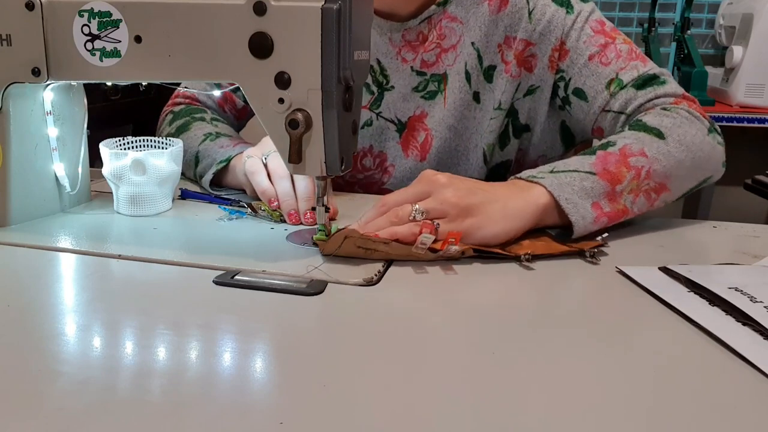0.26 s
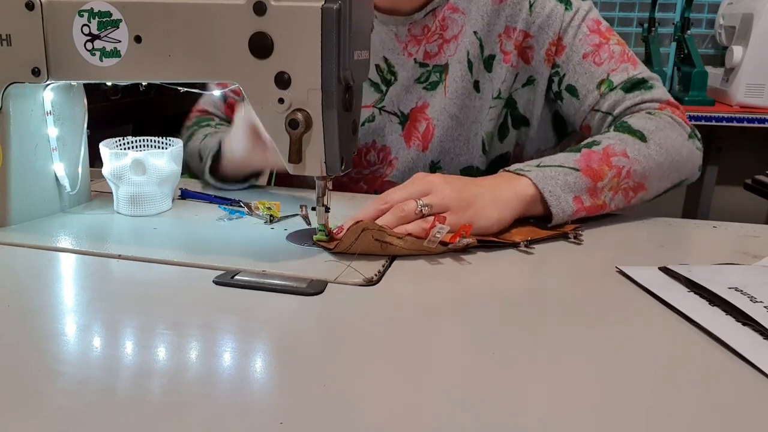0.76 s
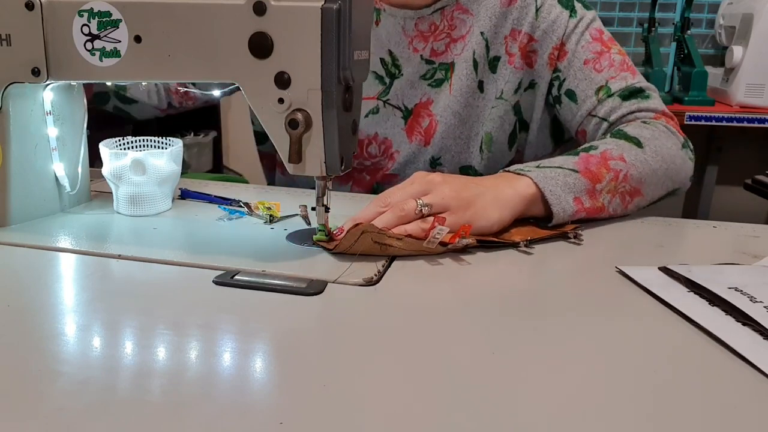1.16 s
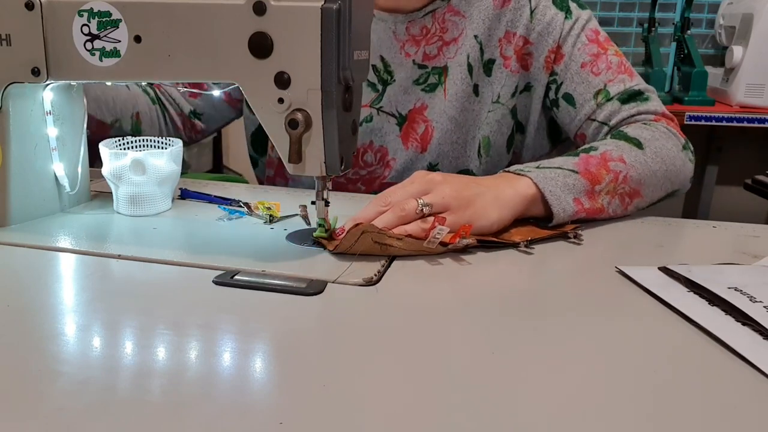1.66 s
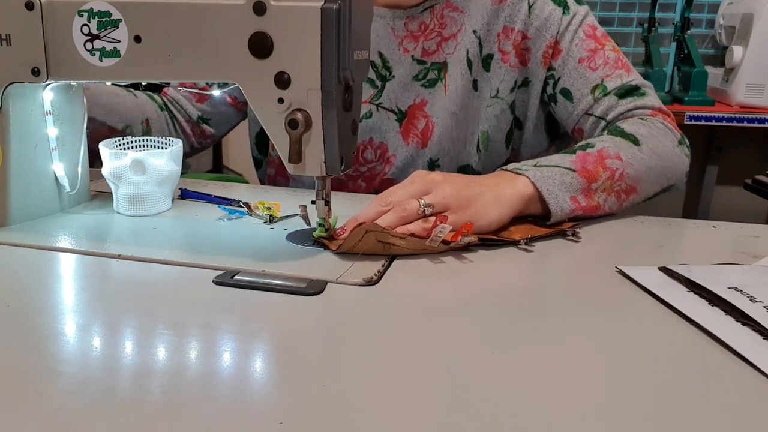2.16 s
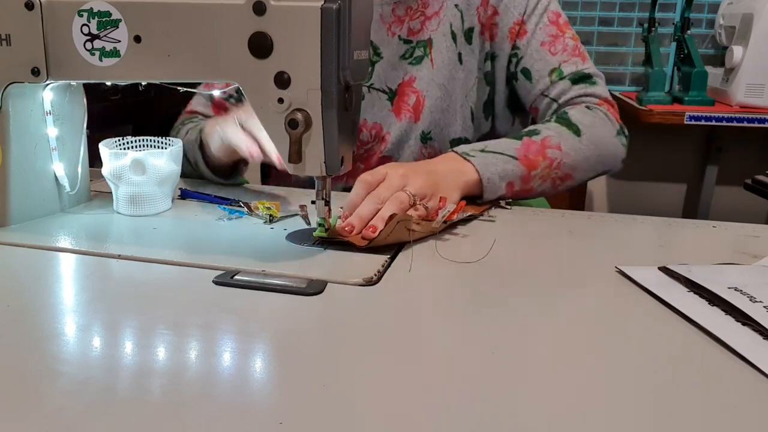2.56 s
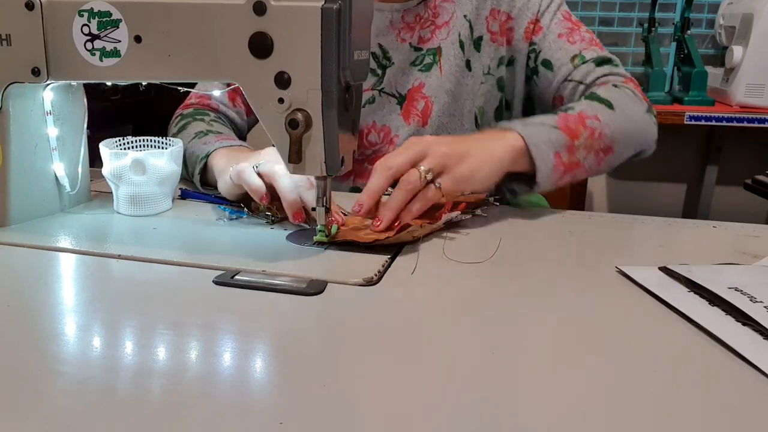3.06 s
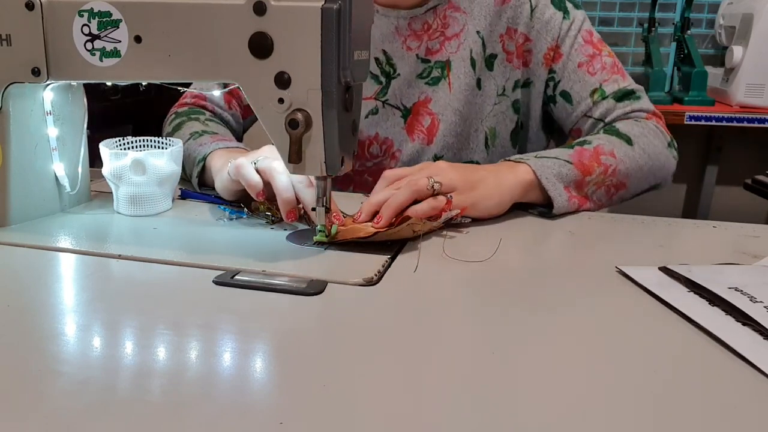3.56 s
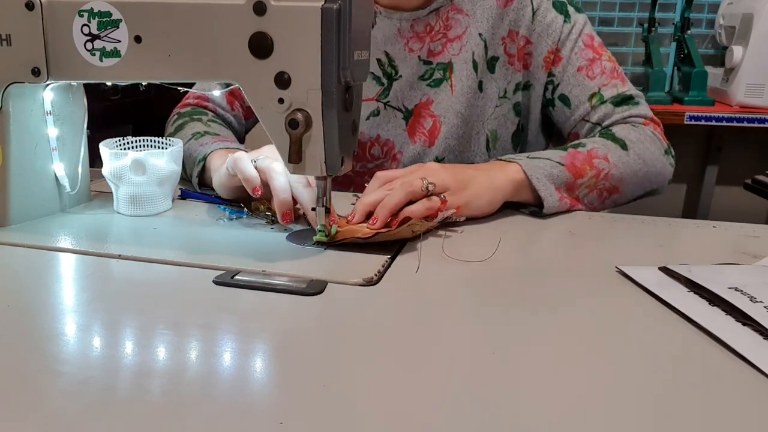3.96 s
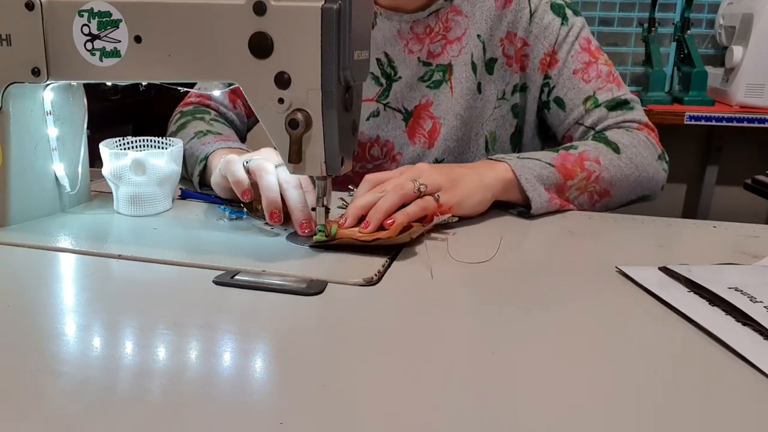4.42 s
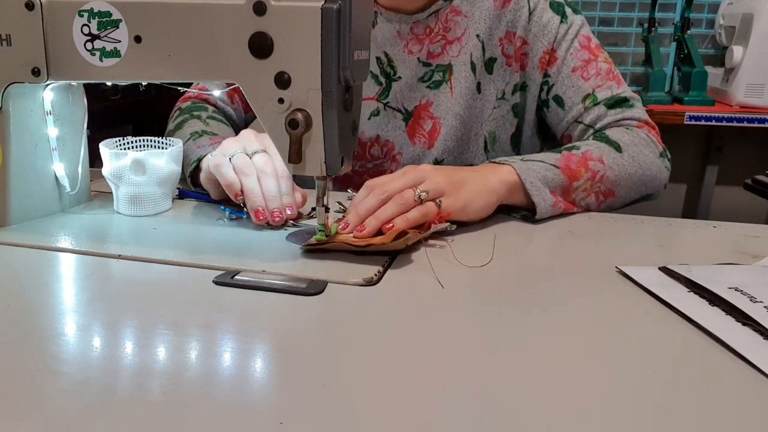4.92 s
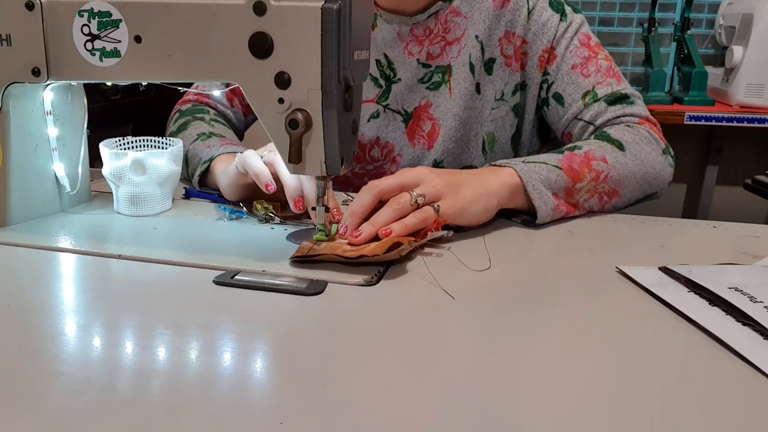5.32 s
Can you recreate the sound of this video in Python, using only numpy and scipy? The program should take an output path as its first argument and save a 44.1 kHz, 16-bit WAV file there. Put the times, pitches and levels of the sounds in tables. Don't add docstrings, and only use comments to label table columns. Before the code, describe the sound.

An industrial sewing machine fires a short clattering burst, pauses amid handwheel knocks, faint ticks and a presser-foot clunk, then stitches in a long, whining run.

```python
import sys
import numpy as np
from scipy import signal
from scipy.fft import rfft, irfft, next_fast_len
from scipy.io import wavfile
from scipy.ndimage import map_coordinates

SR = 44100
rng = np.random.default_rng(int(sys.argv[2]) if len(sys.argv) > 2 else 0)


def decibels_to_gain(level_db):
    exponent = np.asarray(level_db, float) / 20
    return 10 ** exponent


def pcm_store(signal):
    levels = np.round(np.clip(np.atleast_2d(signal), -1, 1) * 32767)
    wavfile.write(sys.argv[1], SR, levels.astype(np.int16).T)


N = 246342
T = np.arange(N) / SR


def unit(x):
    return x / np.sqrt(np.mean(x ** 2) + 1e-20)


def along(points, hz):
    f, value = np.transpose(points)
    return np.interp(np.log(hz + 1), np.log(f + 1), value)


def wobble(rate):
    knots = rng.standard_normal(int(N * rate / SR) + 4)
    return np.interp(T, T[::16], map_coordinates(knots, [T[::16] * rate]))


def sine(hz, phase=0):
    return np.sin(2 * np.pi * hz * T + phase)


def filtered(x, response):
    m = next_fast_len(N + SR // 2)
    return irfft(rfft(x, m) * response(np.fft.rfftfreq(m, 1 / SR)), m)[..., :N]


def modes(table, flip=-1):
    def response(f):
        return sum(flip ** k * decibels_to_gain(db) * 1j * f * width / (hz * hz - f * f + 1j * f * width)
                   for k, (hz, width, db) in enumerate(table))
    return response


def evened(response):
    return lambda f: response(f) / np.sqrt(np.mean(np.abs(response(f[::8])) ** 2))


def noise(spectrum, lo_hz=0, hi_hz=SR):
    def colour(f):
        edges = 1 / np.sqrt((1 + (lo_hz / (f + 1)) ** 8) * (1 + (f / hi_hz) ** 8))
        return decibels_to_gain(along(spectrum, f)) * edges
    return unit(filtered(rng.standard_normal((2, N)), colour))


def pulses(turns, sizes):
    at = np.flatnonzero(np.diff(np.floor(turns)))
    out = np.zeros(N)
    out[at] = np.resize(sizes, len(at)) * decibels_to_gain(rng.normal(0, 2.6, len(at)))
    return out


def decays(times, dbs, t60s, rise):
    out, t = np.zeros(N + SR), T[:SR // 4]
    for s, db, t60 in zip(times, dbs, np.broadcast_to(t60s, len(times))):
        out[round(s * SR):][:len(t)] += decibels_to_gain(db - 60 * t / t60) ** 2 * (1 - np.exp(-t / rise))
    return np.sqrt(out[:N])


def gesture(s, attack, hold, release, db):
    corners = np.cumsum(np.abs([s, attack, hold, release]))
    return decibels_to_gain(np.interp(T, corners, db - 28 * np.array([1, 0, 0, 1]), -150, -150))


def scattered(x):
    smear = rng.standard_normal(900) * np.exp(-T[:900] / 0.0034)
    return np.array([x, signal.fftconvolve(x, smear / np.linalg.norm(smear))[:N]])


def echoed(x):
    return np.array([x, .7 * np.roll(x, 45)])


def struck(times, dbs, hz, t60):
    out, t = np.zeros(N + SR), T[:SR // 8]
    chance = rng.normal(0, 1, (len(times), hz.shape[1], 2))
    for s, db, row, (size, detune) in zip(times, dbs, hz, chance.transpose(0, 2, 1)):
        ring = decibels_to_gain(5 * size) @ np.sin(2 * np.pi * np.outer(row * (1 + 0.02 * detune), t))
        out[round(s * SR):][:len(t)] += decibels_to_gain(db - 60 * t / t60) * (1 - np.exp(-t / 0.0003)) * ring
    return scattered(out[:N])


def machine():
    speed, turns, teeth = motor()
    table_run, head_run, hook_run, gear_run = drive_load(speed)
    hand, blows, parts = moved_by_hand(), strokes(), knocks()
    spiky = decibels_to_gain(1.8 * wobble(900))
    push = table_push(table_run, speed, blows, hand[0], parts)
    body = table_top(push) + motor_bracket(table_run, speed, teeth, push)
    body += gears_and_head(gear_run, head_run, hook_run, teeth, blows, spiky)
    body += links(hand, parts, spiky)
    return body, motor_whine(table_run, speed, turns)


# time in seconds, speed in turns per second.
MOTOR_SPEED = [(0, 18.4), (.36, 19.3), (.5, 17), (3.66, 18.6), (4.08, 21), (4.2, 34), (4.3, 50),
               (4.37, 54.3), (4.5, 54), (4.6, 30), (4.72, 20), (4.77, 40), (4.86, 42.3), (4.96, 46.2),
               (5.08, 48.5), (5.27, 48.6), (5.34, 43), (5.42, 20), (5.59, 19)]


def motor():
    speed = np.interp(T, *np.transpose(MOTOR_SPEED))
    turns = np.cumsum(speed) / SR
    return speed, turns, pulses(3 * turns, [1, .8, .9])


# time in seconds, level in dB.
RUN_LOADS = [
    [(.044, -14), (.07, -8.5), (.09, 0.5), (.3, 0.5), (.435, -1.5), (.46, -22), (.49, -41), (.56, -46)],
    [(3.664, -3), (3.8, -1), (4.1, -0.5), (4.25, 1.5), (4.49, -1.5), (4.56, -12.5), (4.66, -1), (4.73, 0),
     (4.9, 0.5), (5.18, 0), (5.31, -3), (5.44, -3), (5.59, 2.5)],
]
# level at slow speed in dB, growth in dB per doubling of speed.
LAYER_GROWTH = [
    (-42, 2.5),
    (-48, 7),
    (-73, 17.5),
    (-54, 0),
]


def drive_load(speed):
    load = sum(decibels_to_gain(np.interp(T, *np.transpose(table), -150, -150)) for table in RUN_LOADS)
    doublings = np.log2(speed / 19)
    return [load * decibels_to_gain(slow_db + more_db * doublings) for slow_db, more_db in LAYER_GROWTH]


# time the hook locks in seconds, peak level in dB, seconds since the needle struck,
# seconds since the feed caught, level of these earlier contacts in dB.
STITCH_TIMES = [(0.1349, -21.5, .0464, .0205, -5.5), (0.298, -22, .0474, .021, -6),
                (3.9378, -20.5, .0489, .0198, -2.5), (4.0908, -20, .043, .019, 0),
                (4.2022, -19.5, 0.021, .014, -12), (4.2852, -20.5, 0.011, .012, -2),
                (4.3387, -18.5, 0.032, .032, -24), (4.3953, -22.5, 0.023, 0.019, -9),
                (4.453, -20, 0.024, 0.02, -6), (4.512, -21, 0.028, .028, -13.5),
                (4.6471, -18.5, .0432, .021, -6.5), (4.794, -21, .039, .019, -2),
                (4.8717, -22, 0.022, .024, -16), (4.936, -21.5, 0.031, 0.029, -4.5),
                (5.005, -21, .011, 0.014, -8.5), (5.0656, -21, .02, 0.017, -19.5),
                (5.131, -23, 0.022, .018, -4), (5.1969, -26.5, 0.028, .028, -5.5),
                (5.259, -23.5, 0.028, 0.023, -3), (5.347, -22, 0.025, 0.012, -1),
                (5.4862, -21.5, 0.048, .0215, -2.5)]
# level in dB, growth in dB per doubling of the needle's lead,
# head level in dB, table level in dB.
STITCH_CONTACTS = [
    (-2, 3, -10.5, -17.5),
    (0.5, 0, -4.5, -8),
    (1.5, 0, -7, -10.5),
]
# time in seconds, peak, head and table levels in dB.
LONE_STROKES = [(0.046, -48.5, 9, -14.5), (0.0636, -37.5, -7, -4), (0.416, -28, -6.5, -12.5),
                (.452, -36, -1.5, -10.5), (3.771, -24.5, -8, -4.5), (4.558, -30.5, -5, -10),
                (4.605, -26.5, -6, -8), (5.296, -26.5, -1.5, -25), (4.178, -35, 7, 11),
                (0.087, -34, -8, -15), (.2515, -31, -10, -13)]


def strokes():
    rows = []
    for s, db, lead, feed, early_db in STITCH_TIMES:
        for ago, (step_db, more_db, head_db, table_db) in zip([lead, feed, 0], STITCH_CONTACTS):
            peak_db = db + step_db + more_db * np.log2(lead / .035) + early_db * np.sign(ago)
            rows.append((s - ago, peak_db, head_db, table_db))
    return np.transpose(rows + LONE_STROKES)


# time in seconds, peak level in dB,
# bright level in dB, table level in dB, ring in Hz.
WHEEL_KNOCKS = [(0.9608, -38.5, 3, 5, 3370), (0.9703, -26, -3.5, -13, 1450), (1, -30.5, -11, -3, 1710),
                (1.028, -22, -11, -7, 1880), (1.0452, -26.5, -25, -20.5, 1900),
                (1.111, -20.5, -12, -12, 1910), (1.18, -25, -11.5, -7, 4000), (1.1926, -48, -6.5, 1, 1690)]
CLIP_KNOCKS = [(1.4681, -65, -2, -4, 3660), (1.503, -53, -12, -12, 3030), (1.668, -47, -40, -15, 2060),
               (1.729, -46, -18, -16.5, 1780), (1.794, -52, -6, -20, 3970), (1.967, -53, -19, -11, 1610),
               (2.01, -44.5, 0, -35, 2020), (2.058, -42, -7, -17, 3400), (2.1002, -48.5, -22, -18, 1750),
               (3.134, -45.5, -4.5, -32, 1760), (3.269, -59.5, 1.5, -32, 1630)]
FOOT_KNOCKS = [(2.828, -41, -35, -25, 2980), (2.888, -44, -9, -22, 5040), (2.91, -51, -6, -25, 1760),
               (2.9314, -34.5, -3, -18, 5400), (2.9392, -29.5, -39, -4.5, 4000),
               (2.955, -21, -16, -10.5, 3250)]
KNOCK_DECAYS = [0.18, 0.12, 0.2]


def knocks():
    columns = np.transpose(WHEEL_KNOCKS + CLIP_KNOCKS + FOOT_KNOCKS)
    t60 = np.repeat(KNOCK_DECAYS, [len(WHEEL_KNOCKS), len(CLIP_KNOCKS), len(FOOT_KNOCKS)])
    return *columns, t60 * (2000 / columns[-1]) ** 0.54


# start in seconds, attack in seconds,
# release in seconds, table level in dB, brightness in dB.
HAND_MOVES = [(.935, 0.045, 0.27, -42, 2), (1.09, .025, 0.19, -40, -9.5), (1.3, 0.06, .14, -74, 5),
              (1.652, 0.024, 0.26, -63, -1), (1.8, 0.06, 0.12, -54, -9), (2.69, 0.08, .2, -46.5, -22),
              (2.8, 0.05, .16, -60, 1), (2.925, .025, .36, -43, -18), (3.05, 0.14, 0.55, -81, 5),
              (3.64, .02, 0.17, -48.5, -17)]


def moved_by_hand():
    return sum(np.outer(decibels_to_gain([0, bright_db, bright_db - 5]), gesture(s, attack, 0, release, db))
               for s, attack, release, db, bright_db in HAND_MOVES)


def table_push(table_run, speed, blows, hand, parts):
    s, db, _, table_db = blows
    knock_s, knock_db, _, thud_db, _, _ = parts
    shake = 1.31 * table_run * np.clip(speed / 50, .45, .75) + decays(s, db + table_db, 0.045, 0.006)
    dull = [(50, -11), (110, -3), (200, -7.5), (300, -2.0), (500.0, -3.5), (2000, -1.5)]
    taps = (.5 * hand + decays(knock_s, knock_db + thud_db + 12, 0.075, 0.0057)) * noise(dull)
    return shake * rng.standard_normal((2, N)) + 0.44 * taps


# pitch in Hz, width in Hz, level in dB.
TABLE_MODES = [(75.7, 21, -12), (107.6, 32, -5), (151, 25, -23), (191, 32, 1.5), (254.4, 35, -3.5),
               (642, 209, -3), (786, 126, -3), (1026, 67, -10.5)]


def table_top(push):
    def wood(f):
        plain = decibels_to_gain(-12.5) / (1 + 1j * f / 900) ** 2
        return (modes(TABLE_MODES)(f) + plain) * f ** 2 / (f ** 2 + 45 ** 2)
    return filtered(push, evened(wood))


# pitch in Hz, width in Hz, level in dB.
BRACKET_MODES = [(104.6, 7.5, -8.5), (365.7, 7, 2.5), (422, 19, -.5), (534, 28, -2.5), (700.5, 22, -0.5),
                 (889, 75, -7.5)]
# pitch in Hz, level in dB.
BRACKET_NOTES = [(352, -2), (431, 0), (533, 0)]


def motor_bracket(table_run, speed, teeth, push):
    drive = table_run * (0.5 * scattered(unit(teeth)) + .5 * rng.standard_normal((2, N))) + 0.5 * push
    bracket = lambda f: modes(BRACKET_MODES)(f) / (1 + 1j * f / 2000) ** 2
    drone = filtered(drive * np.clip((70 - speed) / 35, .55, 1), evened(bracket))
    sung = sum(decibels_to_gain(db + 2.5 * wobble(12)) * sine(hz, 1.1 * wobble(7)) for hz, db in BRACKET_NOTES)
    return drone + echoed(decibels_to_gain(-7) * table_run * np.clip((60 - speed) / 30, .3, 1) * sung)


# frequency in Hz, level in dB per Hz.
STEEL_COLOUR = [(470, -29), (900, -4.5), (2070, -4), (4000, -5), (6380, -6.5), (10900, -12), (14200, -10),
                (15700, -19), (16200, -43)]
# frequency in Hz, level in dB per Hz.
GEAR_COLOUR = [(2500, -30), (3500, -4), (4500, -20), (5300, -6), (5800, 0), (6500, -30)]
# pitch in Hz, width in Hz, level over the plain path in dB.
HEAD_MODES = [(1635, 42, 6.5), (2113, 143, 10), (3690, 210, -6), (4040, 140, 3), (4790, 290, 3),
              (6400, 36, -10), (8240, 430, 8.5), (8940, 120, 8), (10860, 780, 5)]


def gears_and_head(gear_run, head_run, hook_run, teeth, blows, spiky):
    s, db, head_db, _ = blows
    tooth_shape = np.exp(-T[:800] / .0035) - np.exp(-T[:800] / .0006)
    tick = unit(signal.fftconvolve(teeth, tooth_shape)[:N])
    rolling = (0.77 + 0.21 * tick) * decibels_to_gain(4.15 * wobble(60) + 0.77 * wobble(400))
    ping = gear_run * decibels_to_gain(3.5) * (0.25 + 1.1 * np.abs(tick)) * noise(GEAR_COLOUR, 2500, 6600)
    head = head_run * rolling
    head += decays(s, db + head_db - 5.0, 0.095, 0.003) * decibels_to_gain(2.3 * wobble(300))
    head += spiky * decays(s, db + head_db - .7, 0.016, 0.0031)
    hook = hook_run * decibels_to_gain(2.5 * wobble(80)) + decays(s, db - 10.0, 0.047, 0.006)
    hook += spiky * decays(s, db - 7.5, 0.016, 0.0037) + decays(s, db - 30.0, .3, .004)
    metal = head * noise(STEEL_COLOUR, 750, 5330) + hook * noise(STEEL_COLOUR, 6700)
    casting = decibels_to_gain(-4) * filtered(metal, lambda f: 1.22 + .5 * modes(HEAD_MODES, flip=1)(f))
    pitches = np.tile(np.transpose(HEAD_MODES)[0], (len(s), 1))
    return ping + casting + struck(s, db + head_db - 18.5, pitches, t60=0.02)


# pitch in Hz, width in Hz, level over the plain path in dB.
LINK_MODES = [(1222, 58, 9.5), (1890, 660, 5.5), (2980, 290, 3.5), (3600, 260, -0.5), (4000, 140, -10),
              (8200, 120, -5)]


def links(hand, parts, spiky):
    s, db, bright_db, _, ring_hz, t60 = parts
    low = hand[1] * decibels_to_gain(5.1 * wobble(53.78)) + decays(s, db - 7.0, t60, 0.0013)
    low += spiky * decays(s, db - 10, 0.0087, .001)
    high = hand[2] + decays(s, db + bright_db, 1.02 * t60, 0.00073)
    rattle = low * noise(STEEL_COLOUR, 750, 5200) + high * noise(STEEL_COLOUR, 6100, 9700)
    rings = struck(s, db - 14, np.outer(ring_hz, [.87, 1.0, 1.18]), t60=.009)
    return rings + decibels_to_gain(-4.0) * filtered(rattle, lambda f: 0.39 + 0.42 * modes(LINK_MODES, flip=1)(f))


# multiple of the turns, level in dB.
SHAFT_ORDERS = [(4, -8), (8, -7), (9, -7), (10, -4), (11, -9), (12, 4), (14, 0), (16, -1), (18, -10),
                (20, -11)]
# pitch in Hz, width in Hz, level in dB.
ORDER_SWELLS = [(358, 14, 7), (432, 14, 5), (522, 28, 5)]
# pitch in Hz, level in dB.
TABLE_NOTES = [(75, -15), (180, -8), (232, -7)]


def motor_whine(table_run, speed, turns):
    def swell_db(hz):
        return sum(db * np.exp(-((hz - centre) / width) ** 2) for centre, width, db in ORDER_SWELLS)
    whine = sum(decibels_to_gain(db + swell_db(k * speed) + 1.5 * wobble(8)) * np.sin(2 * np.pi * k * turns)
                for k, db in SHAFT_ORDERS)
    whine += sum(decibels_to_gain(db + 2.8 * wobble(14)) * sine(hz, 1.5 * wobble(12)) for hz, db in TABLE_NOTES)
    return table_run * np.clip((speed - 36) / 10, 0, 1) * whine


def cracks():
    s, db = strokes()[:2]
    late, size = rng.random((len(s), 2, 6)).transpose(1, 0, 2)
    at = np.round((s[:, None] + 0.0049 * late ** 2) * SR).astype(int)
    tips = decibels_to_gain(db[:, None] - 12.5 - 6 * late) * (2 * size - 1)
    hook = modes([(4000, 900, -8.5), (8400, 300, 6.5), (11100, 1900, 16.5), (13500, 2500, 0.0)])
    return scattered(4 * filtered(np.bincount(at.ravel(), tips.ravel(), N), hook))


# time in seconds, peak level in dB, ring in Hz, cycles to fade.
STEEL_TICKS = [(.126, -23, 2200, 10), (.165, -30, 3470, 13), (0.448, -35, 2150, 6.7),
               (1.1142, -24, 4030, 11), (1.0492, -29, 1930, 7.6), (1.119, -28, 2030, 6.1),
               (1.1785, -19.5, 4100, 8.8), (1.672, -52, 3470, 27), (1.675, -48, 2020, 14),
               (1.179, -26, 5000, 9), (1.178, -30, 2480, 8), (.301, -25, 2150, 13), (.331, -29, 3600, 10),
               (.253, -33, 2100, 9), (4.831, -29, 2180, 9), (5.2, -32, 2200, 9.2), (5.337, -25, 2090, 13),
               (5.518, -27, 3500, 9.5), (4.31, -32, 3300, 8), (4.485, -27, 3800, 8), (1.794, -54, 3900, 17),
               (2.011, -54, 3940, 11), (2.0573, -37, 3830, 6), (2.065, -50, 4500, 6),
               (2.9325, -25, 6190, 4.8), (2.9332, -29.5, 3700, 9.1), (2.942, -28.5, 4440, 8),
               (2.9572, -23, 4340, 6.3), (2.959, -25.5, 3190, 16), (3.9394, -27, 3920, 8),
               (4.34, -20, 4070, 7), (4.4532, -22, 4000, 7), (4.649, -20, 4000, 8), (4.756, -32, 2300, 8),
               (3.878, -36, 5750, 18), (3.968, -34, 3660, 16), (4.0335, -38, 5700, 19),
               (4.197, -20, 2560, 8), (4.275, -23, 2180, 13), (4.3485, -21.5, 3500, 9.5),
               (4.4577, -19, 3480, 6), (4.469, -21.5, 3870, 10), (4.538, -27, 3570, 17),
               (4.638, -26, 2120, 26), (4.678, -33, 3720, 15), (4.876, -22.5, 4000, 12),
               (4.9385, -27, 3100, 5.3), (4.952, -28, 2500, 6), (5.007, -19.5, 4000, 15)]


def snaps():
    out, t = np.zeros(N + SR), T[:SR // 20]
    for s, db, hz, cycles in STEEL_TICKS:
        fade = decibels_to_gain(db + 1.5 - 60 * t * hz / (3 * cycles)) * (1 - np.exp(-t * hz))
        out[round(s * SR):][:len(t)] += fade * 1.32 * np.sin(2 * np.pi * hz * t)
    return scattered(out[:N])


# time in seconds, pitch in Hz, level in dB, decay to -60 dB in seconds.
RINGING_PARTS = [(1.2, 378, -50, 1.0), (.958, 362, -43, .5), (3.667, 350, -49, .4), (.05, 345, -58, .3),
                 (.455, 55, -57, .35), (2.75, 42, -66, .3), (3.67, 70, -62, .4), (1.03, 110, -41, .3),
                 (1.19, 148, -40, .35), (1.19, 694, -42, .2), (1.195, 195, -39, .25),
                 (1.675, 200, -66, .25), (2.055, 205, -66, .25), (2.96, 3200, -45, .25),
                 (2.83, 3050, -50, .15), (2.953, 640, -36, .1), (1.365, 1200, -73, .1),
                 (1.357, 2860, -64, .1), (1.335, 2900, -67, .06), (1.338, 3560, -64, .06),
                 (1.357, 1700, -66, .05)]
SINGLE_CLUNKS = [(.965, 610, -37.5, 0.21), (.972, 1600, -39.5, 0.47), (.97, 700, -51, .12),
                 (1.03, 425, -37.5, 0.41), (1.035, 1200, -47, 0.089), (1.03, 930, -33, 0.46),
                 (1.035, 1490, -37.5, 0.17), (1.03, 920, -44, 0.25), (1.112, 172, -35.5, 0.35),
                 (1.2, 320, -47.5, .2), (1.185, 690, -32, 0.14), (1.113, 829, -45, 0.36),
                 (1.115, 1200, -46, 0.14), (1.18, 1200, -51, 0.17), (1.2, 1180, -51.5, 0.22),
                 (2.942, 160, -38, 0.094), (2.958, 390, -34, 0.12), (2.957, 390, -38, 0.1),
                 (2.94, 800, -40.5, 0.25), (2.96, 700, -40.5, 0.24), (2.85, 235, -41.5, 0.17),
                 (2.828, 4980, -55, 0.075), (1.9, 3700, -63, .15), (1.182, 1090, -40.5, 0.13),
                 (.96, 400, -36.5, 0.2), (1.04, 1700, -38.5, 0.204), (2.955, 660, -35, .1)]


def loose():
    out, t = np.zeros(N + SR), T[:SR]
    for s, hz, db, t60 in RINGING_PARTS + SINGLE_CLUNKS:
        fade = decibels_to_gain(db - 60 * t / t60) * (1 - np.exp(-t / 0.0012))
        out[round(s * SR):][:SR] += fade * np.sin(2 * np.pi * hz * t)
    return pair(scattered(out[:N]))


def lever():
    return scattered(squeaks() + lifter())


# start in seconds, length in seconds, pitch in Hz, level in dB, overtone level in dB.
LEVER_SQUEAKS = [(1.164, 0.026, 1725, -36, 9), (1.209, 0.022, 1720, -39.5, -6),
                 (1.848, 0.021, 1802, -39.5, -3), (1.875, 0.015, 1825, -52, -10),
                 (2.957, 0.013, 1844, -37.5, -8)]
# multiple of the pitch, level in dB.
SQUEAK_OVERTONES = [(3, -26), (4, -14.5), (5, -31), (6, -32)]


def squeaks():
    out = np.zeros(N + SR)
    rasp = wobble(350)
    for s, length, hz, db, upper_db in LEVER_SQUEAKS:
        t = T[:round(length * SR)]
        swell = np.sqrt(np.abs(np.sin(np.pi * (t - 0.51 * t * (t - length)) / length)))
        t = t - 0.51 * t * (t - length)
        tone = np.sin(2 * np.pi * hz * t) + decibels_to_gain(upper_db - 1) * np.sin(4 * np.pi * hz * t)
        for k, level in SQUEAK_OVERTONES:
            tone += decibels_to_gain(level + min(upper_db, 0)) * np.sin(2 * np.pi * k * hz * t)
        start = round(s * SR)
        out[start:][:len(t)] += decibels_to_gain(db) * swell * tone * decibels_to_gain(2.5 * rasp[start:][:len(t)])
    return out[:N]


# time in seconds, slips per second, level in dB.
LIFTER_GROAN = [(2.655, 182, -92), (2.668, 176, -66), (2.696, 172, -58.5), (2.717, 159, -46),
                (2.765, 167, -42.5), (2.795, 169, -52), (2.857, 200, -43), (2.87, 180, -81),
                (2.9, 210, -80)]


def lifter():
    s, rate, db = np.transpose(LIFTER_GROAN)
    bright_db = 7.5 + 1.1 * (db + 45) - 99 * np.clip(s - 2.733, 0, None)
    slip_rate = np.interp(T, s, rate) * (1 + 0.0303 * wobble(90))
    slips = unit(pulses(np.cumsum(slip_rate) / SR, [1]))
    grit = decibels_to_gain(1.03 * wobble(300)) * rng.standard_normal(N)
    low = unit(filtered(slips + 1.3 * grit, lambda f: modes([(175, 90, 0)])(f) ** 2))
    rod = modes([(272, 33, -23), (442, 29, -4.5), (644, 40, -6.0), (831.0, 9.5, 0.0),
                 (1244, 82, -11.0), (1630, 84, -4.0), (3080, 10000, -17.5)])
    high = unit(filtered(slips + 1.4 * grit, lambda f: rod(f) / (1 + 1j * f / 4000) ** 4))
    return decibels_to_gain(np.interp(T, s, db, -150, -150)) * (low + decibels_to_gain(np.interp(T, s, bright_db)) * high)


# start in seconds, attack, hold and release in seconds, level in dB.
SLEEVE_RUBS = [
    (1.973, 0.26, 0.18, 0.19, -60.5),
    (2.045, .27, 0.17, 0.38, -67.5),
]
THREAD_RUBS = [
    (0.55, 0.025, 0.23, 0.12, -75),
    (0.498, 0.081, .3, .08, -71),
]
# frequency in Hz, level in dB per Hz.
CLOTH_COLOUR = [(590, -51), (1000, -17), (1430, 2), (1960, -2), (5440, 1.5), (12400, -8), (16000, -15)]


def hands():
    hiss, drag, whisper, pull = (gesture(*row) for row in SLEEVE_RUBS + THREAD_RUBS)
    cloth = hiss * decibels_to_gain(1.46 * wobble(39.3)) * noise(CLOTH_COLOUR)
    cloth += (drag + pull) * noise([(400, -7.5), (600, 4.0), (900, -7)], 330, 760)
    guide = [(2000, -24.0), (2900, -26), (3170, -2), (3450, -17.5), (9000, -28)]
    return cloth + whisper * noise(guide, 1300, 8600)


# frequency in Hz, correlation.
MIC_LIKENESS = [(30, 0.95), (60, 0.92), (120, 0.94), (250, 0.99), (450, 0.42), (900, 0.17), (2000, 0.16),
                (5000, 0.12), (12000, 0.13)]
# frequency in Hz, left over right in dB.
MIC_LEAN = [(200, -0.5), (400, 5.5), (800, -1), (2000, 0.5), (5000, -1), (8500, 2.5), (10500, 5),
            (13000, -0.5)]


def pair(x):
    def blend(hz):
        turn = np.arccos(np.clip(along(MIC_LIKENESS, hz), -1, 1)) / 2
        return np.array([np.cos(turn), np.sin(turn)])
    a, b = filtered(x, blend)
    return filtered(np.array([a + b, a - b]), lambda hz: decibels_to_gain(along(MIC_LEAN, hz) * np.array([[.5], [-.5]])))


# frequency in Hz, decay to -60 dB in seconds.
ROOM_DECAY = [(150, 0.42), (1000, 0.28), (4000, 0.28), (12000, 0.31)]


def room(x, wet_db):
    hz, t, z = signal.stft(rng.standard_normal((2, SR // 2)), SR, nperseg=256)
    fading = z * decibels_to_gain(-60 * t / along(ROOM_DECAY, hz)[:, None])
    tail = signal.istft(fading, SR, nperseg=256)[1]
    late = np.pad(x, ((0, 0), (300, 0)))
    wet = signal.fftconvolve(late, tail / np.linalg.norm(tail[0]), axes=1)[:, :N]
    return pair(x + decibels_to_gain(wet_db) * wet)


# frequency in Hz, level in dB per Hz.
AIR_COLOUR = [(12, -39.5), (20, -9), (134, -8), (347, -13), (446, -10), (513, -14), (802, -22), (1400, -26),
              (3740, -25.5), (13200, -39), (16000, -41)]
# pitch in Hz, level in dB, left over right in dB.
MAINS_HUM = [(99.5, -80.5, -6), (148.5, -76.5, 6.5), (273, -84.5, 5.5), (443, -80, 18.5), (550, -87.5, 12)]


def background():
    out = decibels_to_gain(-71.5 + 0.4 * wobble(2.3)) * pair(noise(AIR_COLOUR))
    for hz, db, pan_db in MAINS_HUM:
        sides_db = np.array([[.5], [-.5]]) * pan_db
        out += decibels_to_gain(db + 4.0 + sides_db + 0.5 * wobble(2.5)) * sine(hz, 1.1 * wobble(4.8))
    return out


def scene():
    body, whine = machine()
    out = room(body, wet_db=-8) + room(lever(), wet_db=-8)
    out += room(hands(), wet_db=-15.0) * decibels_to_gain([[1.5], [-1.5]])
    out += pair(echoed(whine)) + loose() + background()
    return out + room(cracks() + snaps(), wet_db=-11.0)


def top_cut(x):
    return signal.sosfilt(signal.butter(12, 16970, fs=SR, output="sos"), x)


def record(dry):
    mix = filtered(dry, lambda hz: (hz < 16950) * decibels_to_gain(-8 * (hz > 15900)))
    return top_cut(mix)


dry = scene()
out = record(dry)
pcm_store(out)
```